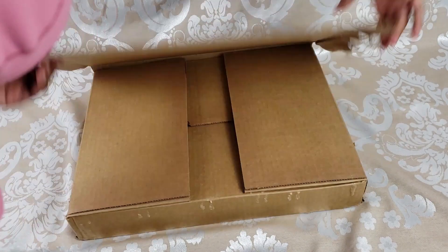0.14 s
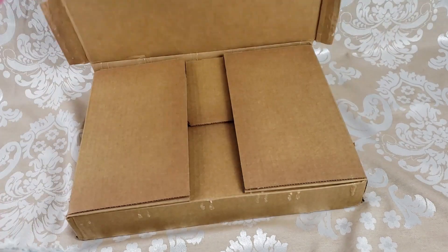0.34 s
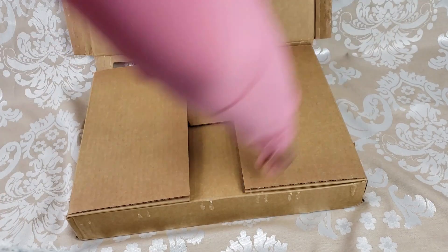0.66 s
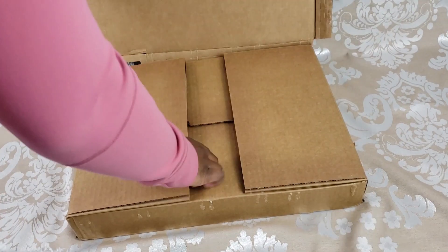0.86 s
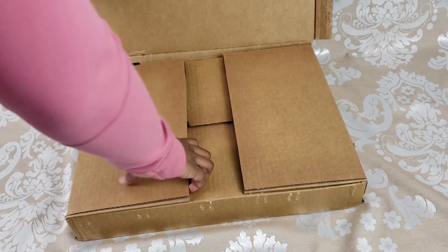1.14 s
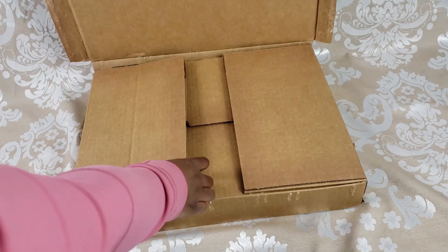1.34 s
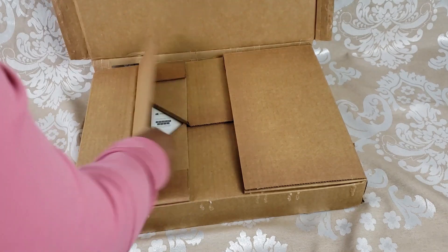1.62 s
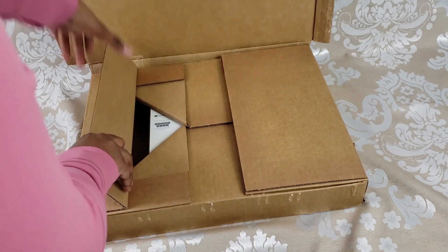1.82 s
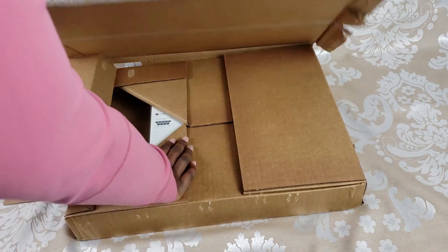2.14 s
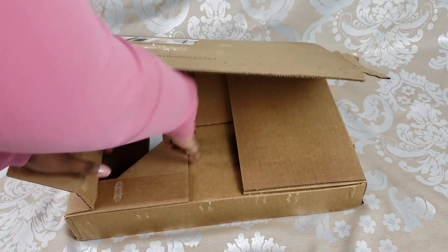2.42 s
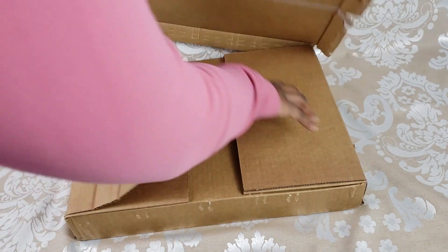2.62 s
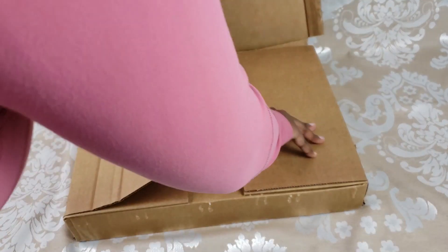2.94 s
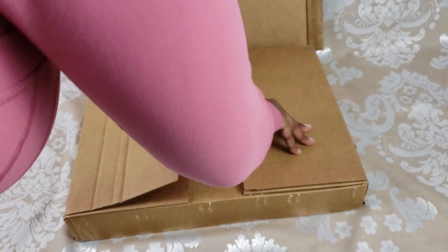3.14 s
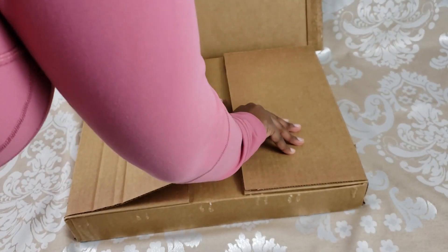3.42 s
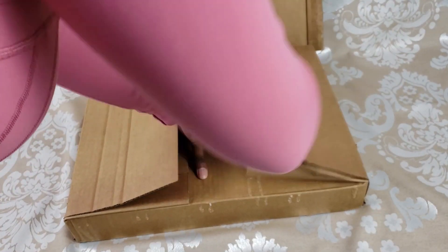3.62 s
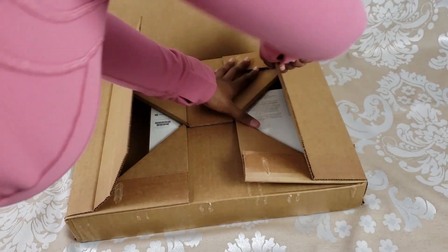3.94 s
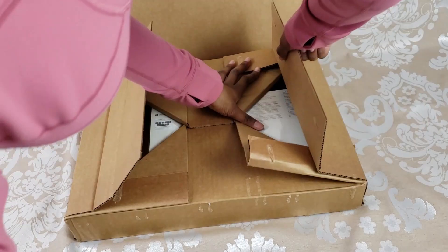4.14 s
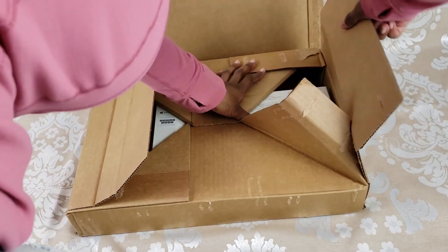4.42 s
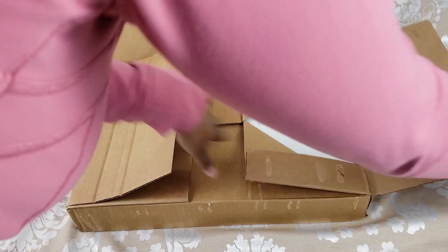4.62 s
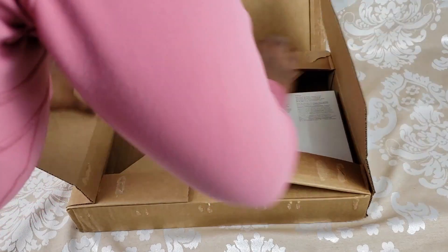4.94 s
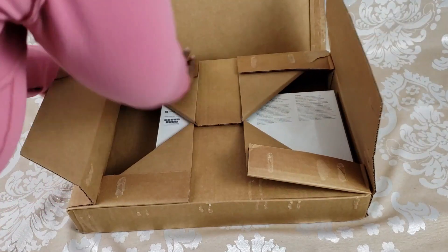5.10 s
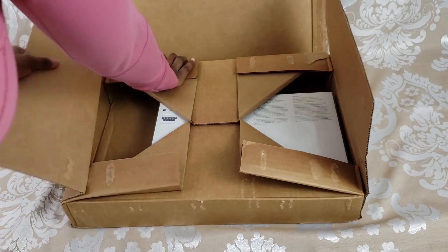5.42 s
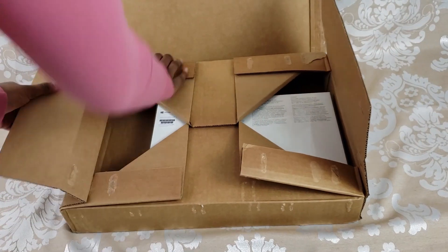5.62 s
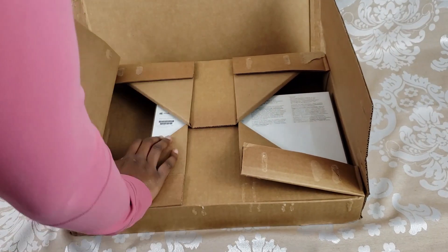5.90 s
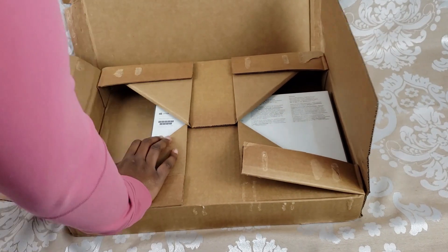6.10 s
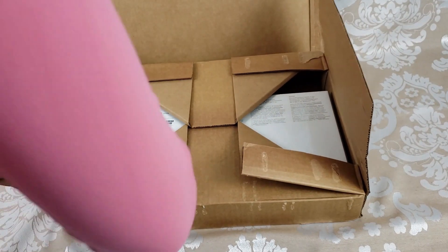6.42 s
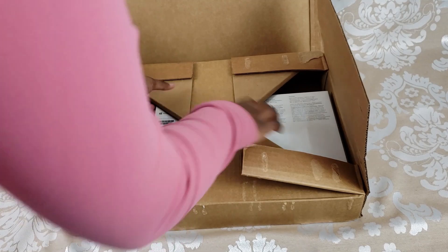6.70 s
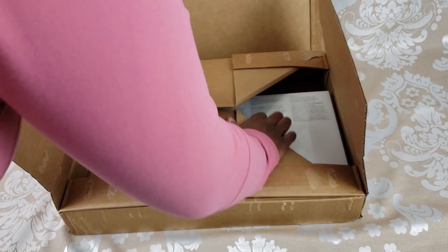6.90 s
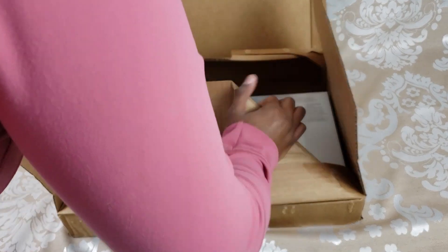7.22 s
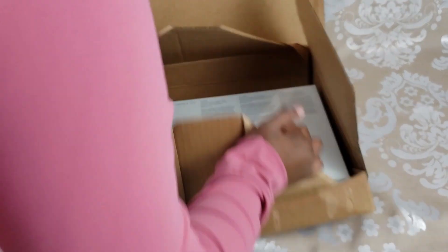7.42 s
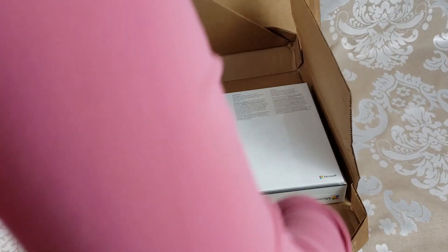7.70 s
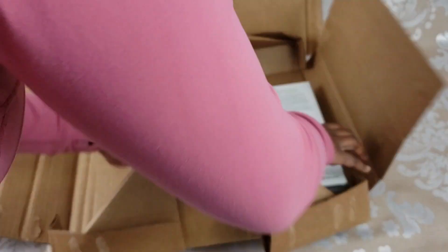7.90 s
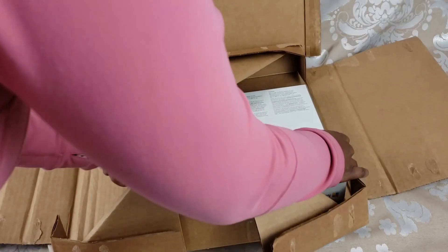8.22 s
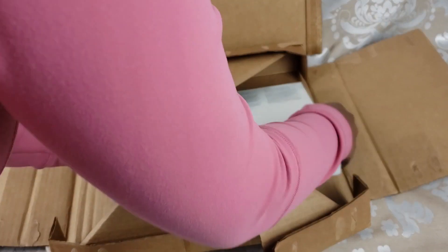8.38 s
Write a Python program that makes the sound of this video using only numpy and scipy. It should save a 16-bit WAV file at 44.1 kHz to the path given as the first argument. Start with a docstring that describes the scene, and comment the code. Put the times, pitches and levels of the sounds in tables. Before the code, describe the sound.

A corrugated cardboard box is opened by hand, close to a stereo microphone pair in a quiet, dry room. A quick burst of sharp cracks starts it, then sparse soft rubs and light taps. Midway, flaps scrape and knock loudly, then come isolated snaps, and a final dense cluster of pops and scraping fades to near silence.

```python
"""Opening a cardboard box

Hands open the flaps of a corrugated box close to two microphones, in a quiet, well damped room.
Sliding board hisses: stick-slip noise, heard directly and through ringing flaps and hollow.
Tabs snap free and flaps knock: noise cracks with crunchy tails, each blow ringing the same modes.
Faint room tone lies under it all."""
import sys
import numpy as np
from scipy import signal
from scipy.fft import rfft, irfft, next_fast_len
from scipy.io import wavfile
from scipy.ndimage import uniform_filter1d

SR = 44100
rng = np.random.default_rng(int(sys.argv[2]) if len(sys.argv) > 2 else 0)


def master_out(mix):
    """Clip the mix to full scale and print it as 16-bit PCM to the path in sys.argv[1]."""
    frames = np.transpose(np.atleast_2d(mix))
    ceiling = np.clip(frames, -1, 1)
    pcm = np.round(ceiling * 32767).astype(np.int16)
    wavfile.write(sys.argv[1], SR, pcm)


N = 377055
FFT_LEN = next_fast_len(N)
HZ = np.fft.rfftfreq(FFT_LEN, 1 / SR)

# Room tone spectrum, relative: freq_hz, level_db (per Hz)
ROOM_SPECTRUM = [(40, -13.5), (311, -16.5), (1010, -17), (2500, -11.5), (3300, -22), (15800, -23)]
# Paper fibres on paper, relative: freq_hz, level_db (per Hz)
HISS_SPECTRUM = [(880, -22.5), (1500, -6), (2810, -8.5), (5990, -8), (8110, -7.5), (8980, -10.5),
                 (12200, -5.5), (15700, -11), (16100, -31), (16800, -49.5)]
# Strokes of hands and flaps over the board: start_s, rise_s, slide_s, hiss_db,
# board_db (scrape, over hiss), hollow_db (rumble, over hiss)
STROKES = [(0.01, 0.015, 0.14, -50.5, 5.5, -1.5), (0.176, 0.043, 0.013, -37, -6.5, -4),
           (0.46, 0.033, 0.0066, -47.5, -16.5, -34), (0.674, 0.15, 0.0065, -44.5, -1, 4),
           (0.884, 0.025, 0.043, -44.5, 0.5, 1), (1.59, 0.032, 0.13, -61, 8.5, 7),
           (1.645, 0.13, 0.0049, -41, -8, -9), (1.81, 0.091, 0.032, -56.5, 1.5, 6),
           (1.938, 0.098, 0.074, -35.5, -8, -6), (2.273, 0.016, 0.0086, -28.5, 2.5, -12.5),
           (2.433, 0.0072, 0.021, -47.5, 2, 5.5), (2.607, 0.0035, 0.035, -49.5, -7, 6),
           (2.87, 0.041, 0.074, -42.5, -10, -9.5), (2.939, 0.064, 0.04, -41.5, 3, -6.5),
           (3.545, 0.026, 0.0051, -30.5, -13.5, -14), (3.615, 0.0027, 0.034, -33, -6, -5.5),
           (3.808, 0.085, .22, -43.5, -9, -10.5), (4.03, 0.037, 0.2, -65.5, -1, 22.5),
           (4.201, 0.11, 0.03, -31.5, -6.5, -14.5), (4.308, 0.0041, 0.064, -25.5, -16.5, -13),
           (4.646, 0.015, 0.055, -50.5, -10, -11), (4.741, 0.046, 0.027, -52, 0, 0.5),
           (4.889, 0.088, 0.32, -44, -7, -8.5), (5.124, 0.021, 0.043, -46.5, 1, 0.5),
           (5.41, 0.036, 0.012, -31.5, 0, -0.5), (5.614, 0.032, 0.077, -51, -5.5, 2.5),
           (5.689, 0.12, 0.078, -51, -19, -49), (5.869, 0.0096, 0.0085, -51.5, -4.5, 0.5),
           (6.051, 0.036, 0.018, -30.5, 1.5, -3.5), (6.297, 0.023, 0.14, -52, 4.5, -12.5),
           (6.408, 0.0081, 0.1, -51, 0, 4.5), (6.499, 0.0056, 0.054, -50.5, -1, -1.5),
           (6.656, 0.037, 0.056, -53.5, 4, -1), (6.89, 0.013, 0.041, -51, 2, -16),
           (7.046, 0.04, 0.0038, -38, -4.5, -22), (7.154, 0.003, 0.26, -52, -22, 3.5),
           (7.306, 0.071, 0.047, -41, -11.5, -9.5), (7.406, 0.039, 0.049, -28.5, -0.5, -0.5),
           (7.52, 0.011, 0.16, -37.5, -19, -3), (7.588, 0.019, 0.018, -30, -5, -6.5),
           (7.735, 0.053, 0.13, -49.5, -0.5, -7), (7.91, 0.021, 0.051, -54.5, 0.5, 6),
           (8.04, 0.027, 0.088, -56.5, 1.5, 4), (8.251, 0.071, 0.024, -71.5, -2.5, -5)]
# Hands resting on the box between strokes, lifted off at the end: time_s, hiss_db
RESTING_HANDS = [(0.66, -63), (1.15, -59.5), (4.3, -56), (4.48, -65), (6.2, -66.5), (7.3, -61.5),
                 (8.12, -63.5), (8.25, -84)]
# Pitch favoured by the rubbed part of the flap: time_s, pitch_hz
RUBBED_SPOT = [(.6, 940), (1.899, 702), (2.3, 1296), (3.0, 2407), (3.4, 883), (4.3, 1118), (5.399, 816),
               (6.099, 1300), (7.5, 750), (8.3, 700)]
# Snaps and knocks: start_s, crack_db (peak before colouring), board_db (over crack),
# hollow_db (over crack), tail_t60_s, spot_hz (pitch favoured by the struck spot)
KNOCKS = [(0.022, -50, 18.5, 22.5, 0.3, 295), (0.118, -19.5, -40, -41, 0.16, 2260),
          (0.2093, -11.5, -6.5, -23.5, 0.12, 1490), (0.2525, -5.5, -21, -33, 0.16, 980),
          (0.566, -42, -10, -5, 0.17, 308), (0.7367, -15.5, -14.5, -17, 0.37, 390.6),
          (0.751, -17, -9.5, -22, 0.11, 410), (0.7926, -13.5, -16, 1, 0.15, 414),
          (0.804, -23, -4.5, 6, 0.078, 108), (0.9734, -38, -17, -3, 0.41, 360),
          (0.985, -26, -3, -21, 0.07, 1950), (0.9935, -20.5, -10, -16.5, 0.097, 3000),
          (1.0647, -31.5, -38, -40, 0.18, 2450), (1.104, -22, -11, -10, 0.14, 366),
          (1.582, -32.5, -5, -8.5, 0.07, 309), (2.0995, -20, -12, -16.5, 0.1, 140),
          (2.2668, -33.5, -12, -8, 0.19, 2000), (2.306, -31.5, 11, 0, 0.12, 292),
          (2.363, -31, -13, -8, 0.35, 2370), (2.6092, -49, 9.5, -3, 0.55, 367),
          (2.8371, -35, 0, -9, 0.3, 1940), (3.395, -37, -12, -12.5, 0.12, 430),
          (3.46, -42.5, -2, 4, 0.39, 129), (3.5611, -14, -39.5, -21, 0.031, 5800),
          (3.5697, -12.5, -29, -14.5, 0.04, 368), (3.6118, -6, -13.5, -9, 0.17, 388),
          (3.6152, -22.5, 2, 10.5, 0.072, 134), (3.689, -21.5, -10.5, -11.5, 0.74, 445),
          (3.7426, -3, -3.5, -8.5, 0.12, 513), (3.7528, -11, -2.5, -3.5, 0.16, 136.4),
          (4.118, -22.5, 4.5, -5, 0.14, 1758), (4.306, -4, -6, -12.5, 0.18, 1080),
          (4.318, -32.5, 3.5, 12.5, 0.19, 237), (4.759, -59.5, -8, 21.5, 0.27, 142),
          (5.1606, -42, -12, 14.5, 0.25, 204.2), (5.356, -26, -19, -24.5, 0.2, 9900),
          (5.443, -7, -6, -7, 0.057, 430), (6.0656, -9.5, -12, -30.5, 0.23, 961),
          (6.0834, -9, -8.5, -29.5, 0.18, 615), (6.251, -43.5, -2.5, -3, 0.91, 500),
          (6.322, -27, -25, -17, 0.067, 926), (6.4971, -36.5, -31, 9, 0.12, 130.7),
          (6.724, -56, -10, 19, 0.2, 175), (6.8291, -43, -18, 15, 0.6, 209),
          (6.906, -25.5, -11.5, -19, 0.43, 195), (7.054, -34.5, -8, 3, 0.069, 203.6),
          (7.3405, -29.5, -36, -27, 0.075, 2460), (7.424, -24, -3.5, -14.5, 0.094, 2050),
          (7.455, -11.5, -3.5, -13.5, 0.49, 700), (7.51, -7.5, -15.5, -19, 0.12, 442),
          (7.5171, -8, -9.5, -19, 0.14, 622), (7.6208, -15.5, -12.5, -10, 0.074, 101),
          (7.76, -43.5, 5, 1, 0.083, 296), (7.931, -51.5, -13, 14.5, 0.1, 145),
          (8.089, -52, 9, 9.5, 0.14, 595), (8.334, -76.5, 22, 6, 0.8, 1144),
          (8.492, -81.5, -1, 28.5, 0.64, 294.4)]
# Bending modes of the flaps: freq_hz, level_db, t60_s
BOARD_MODES = [(706.6, -2, 0.024), (868, 7, 0.0079), (1066, -5, 0.027), (1344, 1, 0.0082),
               (1530, 0.5, 0.0075), (1950, 1.5, 0.0074), (2463, -0.5, 0.021), (2770, -0.5, 0.024)]
# Modes of the air and walls of the hollow box: freq_hz, level_db, t60_s
HOLLOW_MODES = [(55.7, -14.5, 0.082), (76, 3.5, 0.048), (128, -2, 0.087), (179.7, 1.5, 0.056),
                (216, -1.5, 0.098), (249, -8.5, 0.17), (304.2, 0.5, 0.12), (372.3, 0, 0.075),
                (416.3, 0.5, 0.11), (494.6, -2, 0.12), (579.3, 1.5, 0.07)]
# Left-right likeness: freq_hz, likeness (0 to 1)
LIKENESS = [(60, 0.98), (130, 0.92), (290, 0.43), (640, 0.092), (1410, 0.074), (15000, 0.13)]
# Microphone pair colour: freq_hz, left_minus_right_db
MIC_BALANCE = [(150, 1), (380, 1), (950, 2.5), (2380, 1.5), (5980, 1.5), (9500, -5.5), (14000, -1.5)]

ROOM_DB = -77.5
SAG_DB_PER_S, RELEASE_DB_PER_S = 89, 328  # a stroke slows while it slides, then lets go
SWELL_POWER = 1.15  # rise curve: 1 straight, more = later and softer start
REST_BOARD_DB, REST_HOLLOW_DB = -5.5, -3.5  # over resting hiss
PALM_PER_DB = .03  # a blow strong in the hollow comes from the palm: longer contact
MAX_BEND_RATIO = 1.15  # largest pitch ratio of a bent box
LOWCUT_HZ, EDGE_HZ = 52., 16900


def gain_of(db):
    """Amplitude ratio of a level in dB."""
    return 10 ** (np.asarray(db) / 20)


def evened(x):
    """Scale to unit RMS."""
    return x / np.sqrt(np.mean(x ** 2) + 1e-20)


def read(points):
    """A spectrum table at every FFT frequency, interpolated over log frequency."""
    freq_hz, value = np.transpose(points)
    return np.interp(np.log(HZ + 1), np.log(freq_hz + 1), value)


def shaped(x, gain):
    """Filter by a gain per FFT frequency."""
    return irfft(rfft(x, FFT_LEN) * gain, FFT_LEN)[..., :N]


def add(mix, start_s, sound):
    """Add a stereo sound to the mix in place, cut at the end."""
    part = mix[:, round(start_s * SR):][:, :sound.shape[1]]
    part += sound[:, :part.shape[1]]


def paired(x):
    """Two unrelated signals become left and right: alike in the bass, unlike in the treble."""
    same = np.clip(read(LIKENESS), 0, .999)
    right = shaped(x[0], same) + shaped(x[1], np.sqrt(1 - same ** 2))
    return np.array([x[0], right])


def ringing(modes, seconds, spread_db=0., detune=0.):
    """Dying sines; a blow at another spot weights and tunes them a little differently."""
    freq_hz, level_db, t60_s = np.transpose(modes)[:, :, None]
    weight, tuning, polarity = rng.standard_normal((3, len(modes), 1))
    t = np.arange(round(seconds * SR)) / SR
    decay = gain_of(level_db + spread_db * weight - 60 * t / t60_s)
    sines = np.sin(2 * np.pi * freq_hz * (1 + detune * tuning) * t)
    return (decay * sines * np.sign(polarity)).sum(0)


def ticks(per_s, size_db):
    """Single fibres and flutes let go now and then: short decaying puffs of many sizes."""
    size = gain_of(size_db * np.minimum(rng.exponential(1, N), 3))
    puffs = size * (rng.random(N) < per_s / SR)
    return signal.oaconvolve(puffs, np.exp(-np.arange(600) / SR / 0.0014))[:N]


def slips(grain_s, uneven_db, patchy_db, octave_db=0.):
    """Stick-slip noise: force jumps at random, colour drifts in patches as contact moves."""
    jolts = 1 + ticks(per_s=30, size_db=2.5)
    grain = max(round(grain_s * SR), 2)
    jumps = evened(uniform_filter1d(rng.standard_normal(N), grain))
    force = jolts * gain_of(uneven_db * jumps)
    z = signal.stft(rng.standard_normal((2, N)) * force, nperseg=512)[2]

    patches = uniform_filter1d(rng.standard_normal(z.shape[1:]), size=4, axis=0)
    patches = evened(uniform_filter1d(patches, size=9, axis=1))

    # the rubbed spot favours its pitch
    spot_hz = np.interp(np.linspace(0, N / SR, z.shape[2]), *np.transpose(RUBBED_SPOT))
    bin_hz = np.linspace(0, SR / 2, z.shape[1])
    bin_hz = np.clip(bin_hz, BOARD_MODES[0][0], BOARD_MODES[-1][0])[:, None]
    z = z * gain_of(-octave_db * abs(np.log2(bin_hz / spot_hz)))
    return evened(signal.istft(z * gain_of(patchy_db * patches), nperseg=512)[1][:, :N])


def room_tone():
    """Faint, slightly unsteady noise."""
    noise = shaped(slips(.05, uneven_db=0., patchy_db=1.5), gain_of(read(ROOM_SPECTRUM)))
    return gain_of(ROOM_DB) * evened(paired(noise))


def pressure():
    """Gains of hiss, board and hollow: every stroke swells, slides on a little slower, lets go."""
    t = np.arange(0, N / SR + .002, .002)
    start_s, rise_s, slide_s, hiss_db, board_db, hollow_db = np.transpose(STROKES)[:, :, None]
    rise_s, slide_s = np.maximum(rise_s, .003), np.maximum(slide_s, 0)
    since_s = t - start_s
    sag_db = SAG_DB_PER_S * np.clip(since_s - rise_s, 0, slide_s)
    release_db = RELEASE_DB_PER_S * np.maximum(since_s - rise_s - slide_s, 0)
    swell = np.clip(since_s / rise_s, 0, 1) ** SWELL_POWER
    strokes = swell * gain_of(hiss_db - sag_db - release_db)
    rest = gain_of(np.interp(t, *np.transpose(RESTING_HANDS)))

    gains = []
    for stroke_db, rest_db in ((0, 0), (board_db, REST_BOARD_DB), (hollow_db, REST_HOLLOW_DB)):
        power = ((strokes * gain_of(stroke_db)) ** 2).sum(0) + (rest * gain_of(rest_db)) ** 2
        gains.append(np.interp(np.arange(N) / SR, t, np.sqrt(power)))
    return gains


def resonated(modes, gain, grain_s, uneven_db, octave_db):
    """Slips drive the modes of a body; drive power is levelled within the band of the modes."""
    ring = ringing(modes, .15)[None]
    ring = ring / np.sqrt((ring ** 2).sum())
    band = (HZ > modes[0][0]) & (HZ < modes[-1][0])
    band = band / np.sqrt(np.mean(band))
    drive = slips(grain_s, uneven_db, 3.5, octave_db)
    band_power = uniform_filter1d(shaped(drive[0], band) ** 2, size=20000)
    drive = gain * drive / np.sqrt(band_power)
    return signal.oaconvolve(drive, ring, axes=1)[:, :N]


def rubbing():
    """Slips are heard directly as hiss, and through the flaps and the hollow of the box."""
    direct, board, hollow = pressure()
    fibres = slips(.004, uneven_db=1.8, patchy_db=3.)
    out = direct * evened(shaped(fibres, gain_of(read(HISS_SPECTRUM))))
    out += resonated(BOARD_MODES, board, grain_s=.004, uneven_db=3.5, octave_db=8.)
    out += resonated(HOLLOW_MODES, hollow, grain_s=.012, uneven_db=3., octave_db=0.)
    return paired(out)


def struck_modes(modes, spot_hz, octave_db):
    """Hands bend the box: its closest mode moves toward the spot pitch, far modes are weak."""
    bend = min((spot_hz / hz for hz, _, _ in modes), key=lambda ratio: abs(np.log(ratio)))
    bend = np.clip(bend, 1 / MAX_BEND_RATIO, MAX_BEND_RATIO)
    return [(hz * bend, level_db - octave_db * abs(np.log2(hz * bend / spot_hz)), t60_s)
            for hz, level_db, t60_s in modes]


def struck_ring(modes):
    """Ring of struck modes; higher modes reach the two microphones differently."""
    sides = [(hz, level_db + min(18. * np.log2(hz / 900), -3), t60_s)
             for hz, level_db, t60_s in modes]
    middle = ringing(modes, .12, spread_db=4., detune=.018)
    return middle + [[1], [-1]] * ringing(sides, .12, spread_db=3.)


def knocks():
    """A short crack with a crunchy tail; the blow, softer for lower modes, rings flap and hollow."""
    cracks, rings = np.zeros((2, 2, N))
    t = np.arange(round(.2 * SR)) / SR
    crack = t / .0007 * np.exp(1 - t / .0007)
    for start_s, crack_db, board_db, hollow_db, t60_s, spot_hz in KNOCKS:
        noise = rng.standard_normal((2, len(t)))
        tail = gain_of(-60 * t / max(t60_s, .01)) * (1 - np.exp(-t / .0015))
        crunch = gain_of(3.2 * evened(uniform_filter1d(rng.standard_normal(len(t)), size=70)))
        rough_tail = tail * crunch

        # a blunt blow, strong in the board, has less of the highest treble
        dull = np.clip(.015 * (board_db + 29.), 0, .6)
        burst = signal.lfilter([1], [1, -dull], noise * (crack + gain_of(-9.5) * rough_tail))
        # the spot colours the crack
        burst += 2.5 * signal.lfilter(*signal.iirpeak(spot_hz, 3, SR), burst)
        add(cracks, start_s, gain_of(crack_db) * burst / abs(burst).max())

        palm = 1 + PALM_PER_DB * max(hollow_db, 0)
        for modes, over_db, contact_s, rattle, octave_db in (
                (BOARD_MODES, board_db, .0003, .06, 12.), (HOLLOW_MODES, hollow_db, .0021, .07, 14.)):
            push = np.hanning(round(contact_s * palm * SR) + 3)
            blow = rattle * noise * rough_tail  # the flap rattles on after contact
            blow[:, :len(push)] += push / np.sqrt(push.sum())
            ring = struck_ring(struck_modes(modes, spot_hz, octave_db))
            ring = signal.fftconvolve(blow, ring, axes=1)
            add(rings, start_s, gain_of(crack_db + over_db) * ring / abs(ring.mean(0)).max())
    return shaped(cracks, evened(gain_of(read(HISS_SPECTRUM)))) + rings


def scene():
    """The quiet room, sliding and knocks."""
    return room_tone() + rubbing() + knocks()


def record(dry):
    """The two microphones differ in colour and lose the deepest bass; then the band limit."""
    lean_db = read(MIC_BALANCE) / 2
    coloured = shaped(dry, gain_of([lean_db, -lean_db]))
    lowcut = signal.butter(4, LOWCUT_HZ, "high", fs=SR, output="sos")
    coloured = signal.sosfilt(lowcut, coloured)
    band_limit = signal.firwin(511, EDGE_HZ, window=("kaiser", 9), fs=SR)
    return signal.oaconvolve(coloured, band_limit[None], "same")


dry = scene()
out = record(dry)
master_out(out)
```